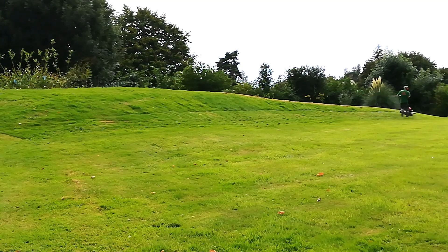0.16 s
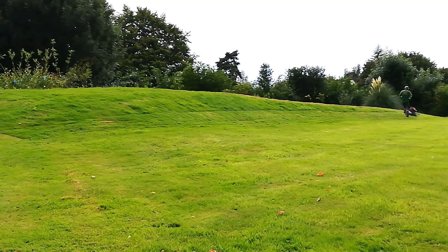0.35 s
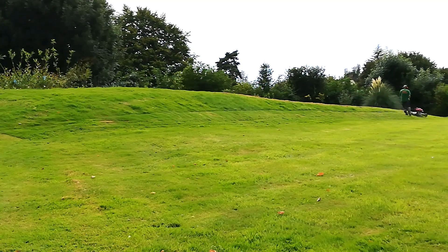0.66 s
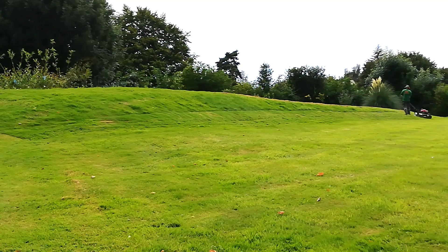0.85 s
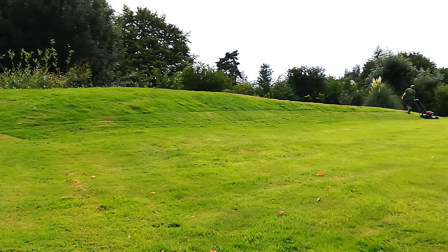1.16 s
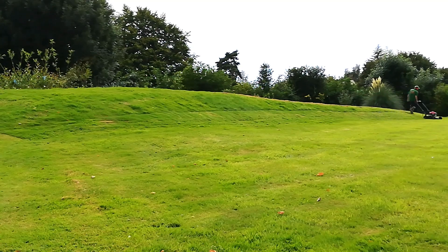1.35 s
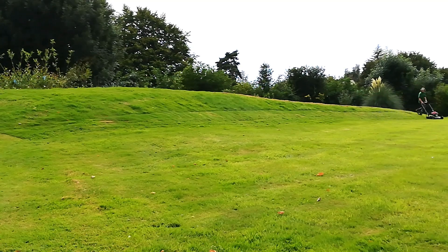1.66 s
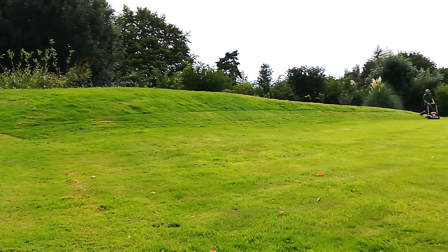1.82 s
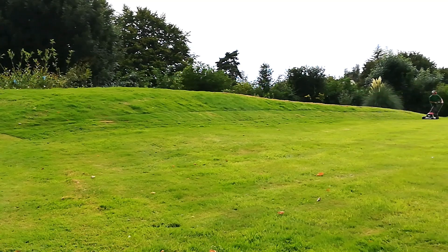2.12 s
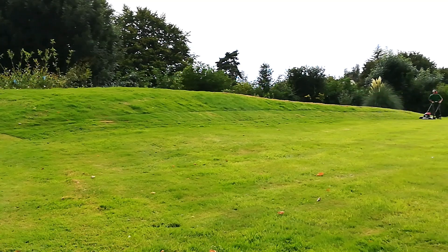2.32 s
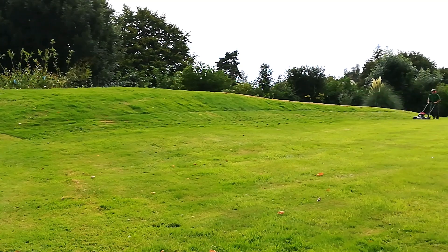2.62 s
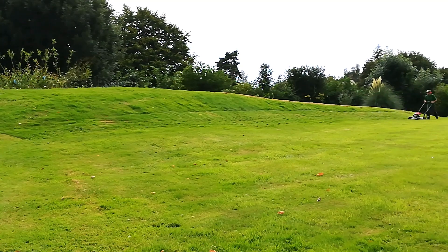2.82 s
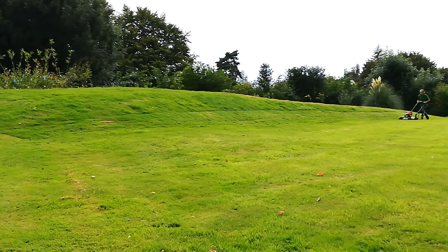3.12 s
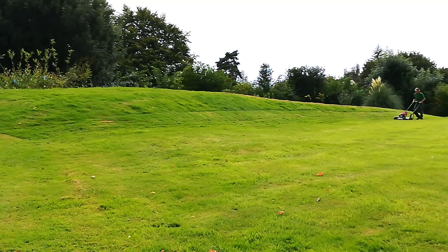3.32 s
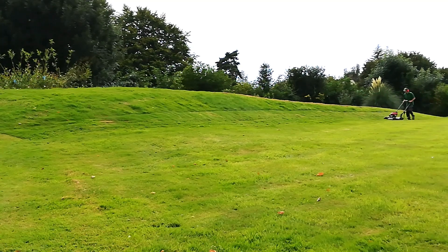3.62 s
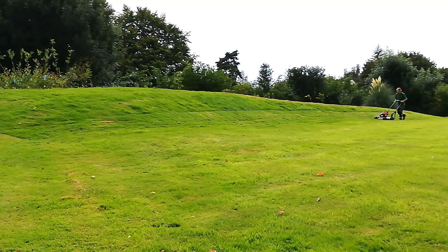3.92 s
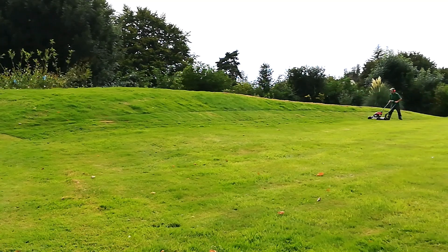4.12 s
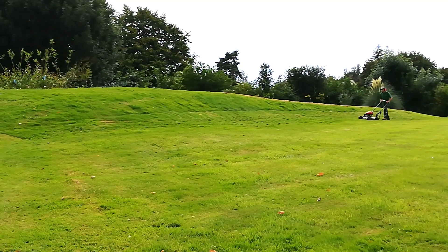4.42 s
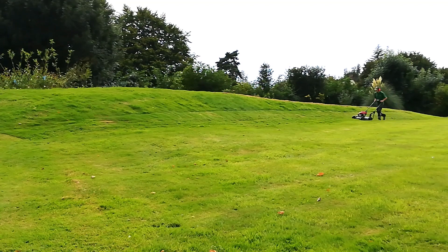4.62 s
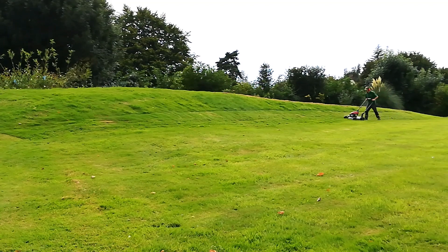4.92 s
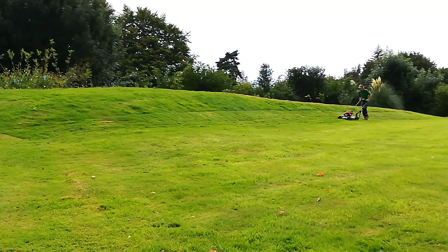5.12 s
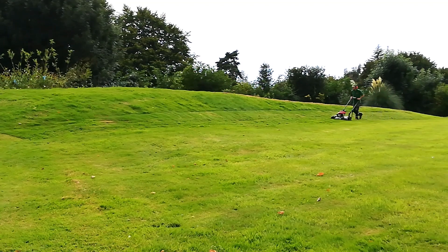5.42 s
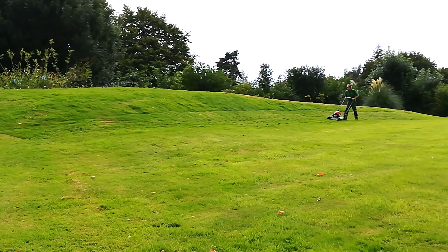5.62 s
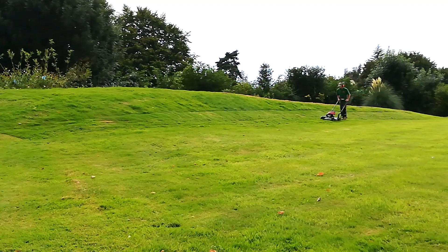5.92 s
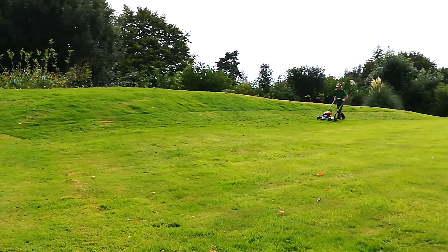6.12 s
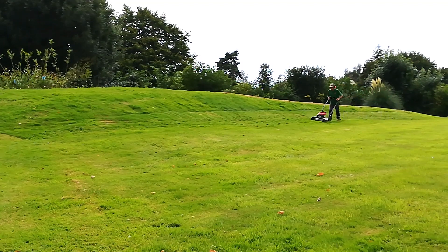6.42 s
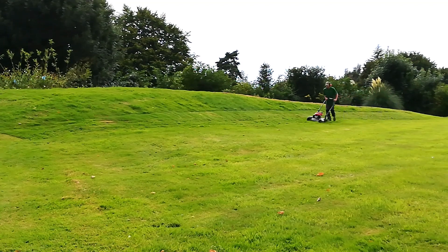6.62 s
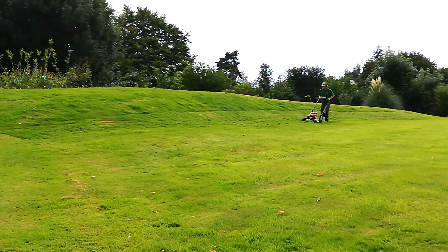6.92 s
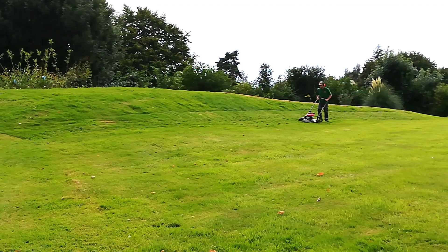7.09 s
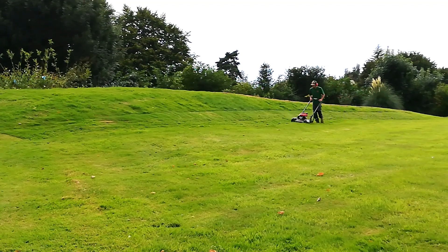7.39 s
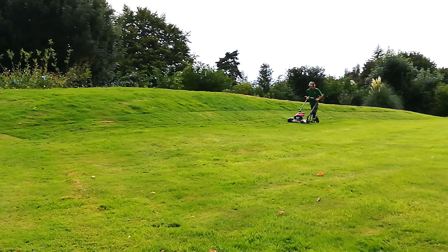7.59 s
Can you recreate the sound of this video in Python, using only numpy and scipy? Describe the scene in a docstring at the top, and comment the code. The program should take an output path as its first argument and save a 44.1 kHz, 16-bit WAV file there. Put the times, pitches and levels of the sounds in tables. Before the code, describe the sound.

A petrol walk-behind mower is heard across an open lawn, already running, about forty metres off and to the right. Its low hum, near 105 strokes a second, carries irregular dull thumps and sharp, dry exhaust cracks as the engine skips beats. From 0.5 to 2 s it turns: firing is more even, pitch lifts slightly around 1.2 s, and hollow deck notes glide up and down; the hum dips near 1.8 s. From about 2.5 s it approaches, the blade rush and grass hiss growing until about 6.3 s, with a more ringing exhaust late on, and moves toward centre. After 7 s the drone fills out, still running at the end. Wind rumbles softly early, then buffets the microphone at 4.1-5.7 s, hardest near 5 s. A small tap sounds left at 3.4 s, a sharp tick at 5.6 s. Leaves rustle faintly throughout.

```python
"""Petrol mower crossing a lawn

A petrol mower works far to the right, turns, then comes nearer and towards the middle.
Its lightly loaded engine skips beats: each firing is a thump in the silencer and a crack of gas at the outlet.
Under them, each stroke pumps a hum and the blade makes noise, chopped into a rush and a hiss of cut grass.
Wind rumbles at the two microphone ports of a camera; leaves rustle, and there is one tap and one sharp tick."""
import sys
import numpy as np
from scipy import signal
from scipy.fft import rfft, irfft, next_fast_len
from scipy.io import wavfile
from scipy.ndimage import uniform_filter1d, map_coordinates

SR = 44100
rng = np.random.default_rng(int(sys.argv[2]) if len(sys.argv) > 2 else 0)


def inscribe(sig):
    """Save sig as 16-bit PCM at rate SR to the path in sys.argv[1].

    A 1-D sig is mono; a 2-D sig holds one channel per row.
    Samples are clipped to [-1, 1] before scaling.
    """
    pcm = np.round(np.clip(np.atleast_2d(sig).T, -1, 1) * 32767)
    wavfile.write(sys.argv[1], SR, pcm.astype(np.int16))


N = 341775
TIME = np.arange(N) / SR  # seconds
SIZE = next_fast_len(N + 8192)  # transform length, with room for filters to ring out
BINS = np.arange(SIZE // 2 + 1) * SR / SIZE  # frequencies in Hz

# Engine speed, which the governor lets wander a little: [t/s, stroke rate f/Hz]
STROKE_RATE = [(0, 106), (.45, 104.7), (.7, 106.5), (.88, 110), (1.22, 111.6), (1.62, 106.6), (1.85, 105.7),
               (2.15, 106.5), (2.45, 103), (2.65, 103.7), (3.15, 107.2), (3.45, 105), (3.7, 107.2),
               (4.3, 104.8), (4.55, 106.5), (5.45, 106.8), (5.62, 103.3), (6.3, 105.3), (6.9, 106),
               (7.15, 104), (7.75, 105.8)]
# The hardest firings: [t/s, strength level/dB, relative]
HARD_FIRINGS = [(0.2007, 9.0), (0.2404, 7.5), (0.2598, 11.0), (0.2972, 10.5), (0.3456, 11.0), (0.401, 8.5),
                (0.4237, 7.0), (0.6514, 10.5), (0.6993, 7.5), (0.7744, 11.5), (0.7928, 7.0), (0.8654, 10.5),
                (0.8839, 9.0), (1.2605, 9.0), (1.3321, 11.0), (1.4234, 11.0), (1.4416, 8.5), (1.496, 7.5),
                (1.5332, 7.5), (1.5584, 8.0), (1.5845, 7.5), (1.609, 13.5), (1.6284, 7.5), (1.7215, 11.0),
                (1.7981, 8.0), (1.8407, 8.5), (2.1435, 9.0), (2.2176, 8.0), (2.256, 8.0), (2.6531, 7.5),
                (2.6925, 8.0), (2.7691, 8.0), (2.8641, 9.0), (2.92, 8.5), (3.351, 7.0), (3.4745, 7.5),
                (3.6526, 7.0), (3.9524, 8.5), (3.9714, 7.5), (4.0006, 9.0), (4.0467, 8.0), (4.1333, 7.0),
                (4.2662, 8.0), (4.3852, 8.0), (4.4236, 10.5), (4.4435, 9.0), (4.5166, 9.0), (4.5436, 7.0),
                (4.6014, 10.0), (4.6518, 13.5), (4.7551, 9.0), (4.8302, 11.0), (4.9277, 7.5), (5.256, 7.0),
                (5.351, 10.5), (5.3757, 8.5), (5.5146, 8.0), (5.768, 7.5), (5.7887, 7.5), (6.0661, 7.5),
                (6.2776, 7.5), (6.3724, 8.5), (6.5054, 7.5), (6.5817, 12.0), (6.7156, 9.5), (6.9062, 11.0),
                (7.0671, 10.0), (7.0875, 9.5), (7.1444, 12.0), (7.1651, 11.0), (7.202, 12.0),
                (7.2981, 10.5), (7.3455, 9.5), (7.3731, 8.5), (7.4325, 8.0), (7.4809, 8.5), (7.5083, 8.0),
                (7.5268, 9.0), (7.5472, 8.5), (7.6241, 9.0), (7.6712, 10.5)]
# Distance of the mower: [t/s, distance/m]
DISTANCE = [(0, 38.6), (2.2, 41.9), (3.8, 38.8), (6.3, 26.2), (7.75, 28.1)]
# Direction of the mower: [t/s, how much later the left port hears it/microseconds]
LEFT_DELAY = [(0, 131), (1.2, 147), (2.8, 142), (4.3, 110), (6.1, 72.2), (7.75, 39)]

# Tone colours: only the shape counts, as each sound is then set to rms 1. All: [f/Hz, relative level/dB]
# Thump of the silencer
SILENCER_TONE = [(25, -19.5), (42, -3.5), (62, 2.5), (85, -15), (108, 0.5), (152, 8), (180, 1.5),
                 (215, -2.5), (257, -2.5), (292, -12), (320, -7), (370, -21), (425, -27), (520, -46.5),
                 (1000, -23), (3000, -103)]
# Rush of air in the deck
RUSH_TONE = [(150, 17), (400, -2), (600, 0.5), (780, -8), (1000, -12), (1450, -0.5), (1750, -3.5),
             (2400, 0.5), (3100, 1), (3900, -1.5), (5000, -4.5), (9000, -32), (16000, -30)]
# Hiss of cut grass
HISS_TONE = [(2000, -31), (3800, 0), (5050, -1), (5700, 4), (6900, 2), (7800, 2.5), (9100, 2.5),
             (10000, -2), (11000, -9), (13000, -15), (16000, -25)]
# Gas cracking at the outlet
CRACK_TONE = [(700, -26), (1500, -10), (3000, -3), (4200, -4.5), (5050, -2.5), (5800, 0.5), (6900, 3.5),
              (7900, -1), (9500, -4), (11000, -16), (16000, -38)]
# Ringing of the outlet's shell
RING_TONE = [(800, -34), (1400, -12), (2000, -15), (3000, -9.5), (3800, -17), (4700, -16), (5100, 0),
             (5400, -3), (5900, -14), (6800, -14), (8500, -40)]
# Hollow notes of the deck
HOLLOW_TONE = [(600, -23), (780, -14.5), (890, -3), (1020, -5), (1180, -1), (1400, -3.5), (1750, -9.5),
               (2200, -6.5), (2600, -10), (3000, -5), (4000, -28)]
# Deep rumble of the wind
WIND_TONE = [(15, -18), (33, -1.5), (70, 2), (130, -7), (220, -16), (400, -42.5), (1000, -88)]
# Finer churning of strong wind
CHURN_TONE = [(30, -32), (90, -6), (170, -7), (260, -14), (400, -33), (1000, -60.5)]
# Sharp tick from the blade
TWIG_TONE = [(1000, -19), (2200, -4), (2700, 5), (3300, 1), (4100, -1), (4800, -20), (6800, 4),
             (12000, -45)]
# Rustle of leaves
LEAVES_TONE = [(100, -5), (400, -14.5), (800, -11), (2000, -53), (6000, -44), (11000, -29), (16000, -33)]

# The camera body shades its two ports differently: [f/Hz, left minus right level/dB]
PORT_SHADE = [(200, 0.35), (350, -0.5), (550, -8), (800, -15), (1100, -4.5), (1850, 3.5), (2600, -9.5),
              (3100, -9), (3800, -0.5), (5200, -3.5), (6500, -5), (8200, 0.5), (10200, 8), (12000, 0.5)]
# The phase between the two ports also turns: [f/Hz, lead of the right port/radians]
PORT_PHASE = [(100, 0.07), (330, 0.79), (600, 2), (720, 1.5), (880, 0.38), (1600, -0.09), (2450, 0.58),
              (3200, 0), (4000, 0.5), (7000, 0.46), (9000, 0.39), (11500, 2.13)]
# Gusts over the ports: [t/s of the middle, width at half power/s, rumble level/dB before churning and patches]
GUSTS = [(.06, .16, -37), (.39, .1, -41), (.68, .14, -44), (1.05, .06, -44), (1.6, .2, -47),
         (4.18, .18, -37), (4.44, .13, -32), (4.64, .12, -41), (4.87, .22, -40), (5.07, .14, -37.5),
         (5.32, .2, -39.5), (5.55, .12, -44), (5.7, .08, -42), (7.1, .6, -50), (7.41, .09, -39)]
# Single eddies that hit the ports: [t/s of the middle, peak level/dB, f/Hz]
EDDIES = [(0.39, -30, 44.4), (4.36, -24.5, 45), (4.396, -21.5, 109), (4.419, -21, 139), (4.45, -21, 75),
          (4.476, -23, 121), (4.521, -29, 109), (4.629, -31, 45), (4.772, -24.5, 48), (5.005, -13.5, 95),
          (5.068, -20, 48), (5.128, -23, 60), (5.25, -23.5, 77), (5.69, -24.5, 80)]
# Patches of grass that raise or lower the whole treble: [t/s of the middle, width/s, level change/dB]
GRASS_PATCHES = [(0.103, 0.63, -0.5), (2.752, 0.36, 2), (3.99, 0.37, 3)]
# The hum fades on the mower's quiet side: [start t/s, attack/s, hold/s, release/s, level change/dB]
HUM_DIPS = [(-.1, 0.25, 0.45, 0.17, -7), (0.852, 0.3, .6, 0.31, -6)]

# Levels at FAR_M, and their rise for each halving of the distance:
# the lawn swallows the middle and the treble most
FAR_M = 40
THUMP_DB, THUMP_NEARING_DB = -42, 6.5  # before its tone is adjusted
HUM_DB, HUM_NEARING_DB = -38.5, 5  # once per stroke
OVERTONES_DB, OVERTONES_NEARING_DB = -56.5, 7  # third harmonic of the hum; the fourth follows it
RUSH_DB, RUSH_NEARING_DB = -46.5, 12.5
TREBLE_DB, TREBLE_NEARING_DB = -49.5, 12  # reference for both hiss and cracks

# The turn, which shows the outlet: (start s, attack s, hold s, release s)
TURN = (0.44, 0.26, 1, 0.56)
TURN_THUMP_DB, TURN_TREBLE_DB, TURN_OVERTONES_DB = 2, -2, -6
TURN_BASS_DB, TURN_BODY_DB, BODY_NEARING_DB = -6, 0.5, 2  # tone of the silencer
# A stretch of more even firing, laid out like TURN, and the average strokes per firing outside and in it
EVEN_RUN = (.55, .12, 1.1, .1)
SKIP_STROKES, EVEN_STROKES = 2.58, 2
# At first the mower is pushed away and its silencer is muffled
AWAY_UNTIL_S, AWAY_FADE_S = 0.7, 0.32
AWAY_BODY_DB, AWAY_OVERTONES_DB = -7.5, -6
# Late in the turn the engine block hides the silencer
SHADOW_S, SHADOW_LENGTH_S, SHADOW_THUMP_DB, SHADOW_HUM_DB = 1.84, 0.44, -1.5, -13.5
# At the end the mower comes side-on and the drone fills out
SIDE_ON_S, SIDE_ON_RISE_S = 7.03, 1
SIDE_ON_BODY_DB, SIDE_ON_OVERTONES_DB = 3.5, 3

# As the mower swings round, the open deck and the hum's octave stand out (laid out like TURN)
HOLLOW_SWELL = (0.11, 0.6, 0.25, 1.2)
HOLLOW_DB, HOLLOW_RISE_DB = -15.5, 9  # over the rush
HOLLOW_GLIDE, HOLLOW_GLIDE_S, HOLLOW_GLIDE_LENGTH_S = .28, 1.38, .8  # its notes rise by this share and fall
OCTAVE_SWELL = (0.78, 0.14, 0.94, 0.14)
OCTAVE_DB, OCTAVE_RISE_DB = -58.5, 8.5

# The outlet rings most when it points at the camera: in the turn and late in the approach
RING_AWAY_DB, RING_FACING_DB = -17, 0.5  # over the crack
FACES_S, FACES_RISE_S = 5.36, 0.75
TURN_FACING = 0.72  # how squarely it points at the camera in the turn, 0-1
RING_WANDER_HZ = 450  # spread, about, of the ringing note's wandering in the turn

BREEZE_DB = -57  # rumble between the gusts
CHURN_DB = -22  # gust level at which the churning equals the rumble
TAP_S, TAP_DB, TAP_DECAY_S = 3.423, -18, 0.0042  # a small tap; level before its push is softened
TWIG_S, TWIG_DB, TWIG_DECAY_S = 5.566, -35.5, 0.011  # the blade clips something hard
TOP_HZ = 15900  # upper limit of the treble


def undb(db):
    """Turn decibels into a gain."""
    return 10 ** (np.asarray(db) / 20)


def unit(x):
    """Scale a sound to rms 1."""
    return x / np.sqrt(np.mean(x ** 2))


def track(table):
    """Join timed values by straight lines, giving one value per sample."""
    s, value = np.transpose(table)
    return np.interp(TIME, s, value)


def over_bins(points):
    """Join (Hz, value) points on a log-frequency axis."""
    hz, value = np.transpose(points)
    return np.interp(np.log(BINS + 1), np.log(hz), value)


def filtered(x, response):
    """Apply a frequency response to a sound."""
    return irfft(rfft(x, SIZE) * response, SIZE)[..., :N]


def colour(x, points, causal=1):
    """Give a sound a tone colour and rms 1; with causal under 1 the filter swells before it rings."""
    cepstrum = irfft(np.log(undb(over_bins(points))), SIZE)
    # moving weight to the first half makes the filter ring only after each sound
    cepstrum[1:SIZE // 2] *= 1 + causal
    cepstrum[SIZE // 2 + 1:] *= 1 - causal
    return unit(filtered(x, np.exp(rfft(cepstrum))))


def noise():
    """White noise: an equal share of all frequencies."""
    return rng.standard_normal(N)


def walk(rate):
    """A smooth random wander around 0, with a new target rate times a second and a spread near 1."""
    k = int(SR / rate)
    steps = np.repeat(rng.standard_normal(N // k + 1), k)
    return 1.53 * uniform_filter1d(uniform_filter1d(steps, k), k)[:N]


def fade(start_s, decay_s):
    """A sudden start and an exponential decay."""
    return (TIME >= start_s) * np.exp(-np.abs(TIME - start_s) / decay_s)


def envelope(start_s, attack_s, hold_s, release_s):
    """Rise from 0 to 1, hold, and fall back."""
    corners_s = np.cumsum([0, attack_s, hold_s, release_s])
    return np.interp(TIME - start_s, corners_s, [0, 1, 1, 0])


def swell(s, length_s):
    """A smooth bump of height 1, length_s wide at half height."""
    return .5 ** ((2 * (TIME - s) / length_s) ** 2)


def pulses(at, size):
    """Single-sample clicks at the given samples."""
    return np.bincount(at, size, N)[:N]


def shifted(x, hz):
    """Move every frequency of a sound by hz, moment by moment."""
    spin = np.exp(2j * np.pi * np.cumsum(hz) / SR)
    return np.real(signal.hilbert(x, SIZE)[:N] * spin)


def toned(x, bass_db, body_db, below_hz=95, body_hz=280):
    """Raise or lower the bass and the body of a sound, moment by moment."""
    bass = filtered(x, 1 / (1 + (BINS / below_hz) ** 6))
    body = filtered(x, np.exp(-(np.log((BINS + 1) / body_hz) / .35) ** 2))
    return x + (undb(bass_db) - 1) * bass + (undb(body_db) - 1) * body


def leaves(db=-63, sway_db=1):
    """Many tiny leaf sounds blend into a faint noise, separate at each port, that sways slowly."""
    rustle = np.array([colour(noise(), LEAVES_TONE) for _ in range(2)])
    return rustle * undb(db + sway_db * walk(1.0))


def wind(patchy_db=3.7, unlike=0.87, unlike_hz=170):
    """Wind rumbles in patches, most alike at both ports in the deep; strong gusts churn and eddies push."""
    gust_power = sum(undb(db) ** 2 * swell(s, length_s) for s, length_s, db in GUSTS)
    gust = np.sqrt(undb(BREEZE_DB) ** 2 + gust_power)
    churning = gust / undb(CHURN_DB)
    common = colour(noise(), WIND_TONE) + churning * colour(noise(), CHURN_TONE)
    side = colour(noise(), WIND_TONE) + churning * colour(noise(), CHURN_TONE)
    side = unlike * filtered(side, BINS / np.hypot(BINS, unlike_hz))
    rumble = (common + side * np.array([[1], [-1]])) * gust * undb(patchy_db * walk(16))
    for s, db, hz in EDDIES:
        # each eddy sucks, then pushes
        angle = np.clip(2 * np.pi * hz * (TIME - s), -10, 10)
        rumble = rumble + undb(db) * angle * np.exp((1 - angle ** 2) / 2)
    return rumble


def ticks(tap_right=0.08, soft_hz=300, click_hz=1350, click=0.49, click_s=0.00052):
    """A tap, mostly at the left port, is a click on a soft push of air; the blade's tick is a noise burst."""
    push = filtered(fade(TAP_S, TAP_DECAY_S), 1 / (1 + 1j * BINS / soft_hz))
    thin_click = click * fade(TAP_S, click_s) * np.sin(2 * np.pi * click_hz * (TIME - TAP_S))
    tap = (push + thin_click) * np.array([[1], [tap_right]])
    twig = np.array([colour(noise(), TWIG_TONE) for _ in range(2)]) * fade(TWIG_S, TWIG_DECAY_S)
    return undb(TAP_DB) * tap + undb(TWIG_DB) * twig


def scatter(x, db=-10, low_hz=450):
    """Moving grass and air pass on a later copy, its phase scrambled differently at each port."""
    thin = signal.hilbert(filtered(x, BINS ** 2 / (BINS ** 2 + low_hz ** 2)), SIZE)
    echoes = []
    for late_s in (.0031, .0047):  # left, right
        late = np.roll(thin, int(late_s * SR))[:N]
        echoes.append(late * np.exp(1j * np.pi * walk(40)))
    return undb(db) * np.real(echoes)


def ports(x):
    """Sound reaches the right port first; the camera body colours the two sides differently."""
    delay_s = track(LEFT_DELAY) / 10 ** 6
    late = map_coordinates(x, [(TIME - delay_s) * SR], order=5)
    left = filtered(late, np.exp(-1j * over_bins(PORT_PHASE)))
    direct = np.array([left, x])
    shade = undb(np.array([[1], [-1]]) * over_bins(PORT_SHADE) / 2)
    shade = shade / np.sqrt(np.mean(shade ** 2, axis=0))  # keep the mean power of the two sides
    return filtered(direct + scatter(x), shade)


def blade(at, shape, chop=.3, chop_s=0.0036, flutter_db=1.5):
    """Air and grass whirl in the deck as noise, chopped at every pass of the blade."""
    passes = unit(filtered(pulses(at, None), rfft(fade(0, chop_s), SIZE)))
    return colour(noise() * (1 + chop * passes), shape) * undb(flutter_db * walk(14))


def deck(at, near):
    """The blade's rush, with hollow notes that swell and glide while the deck shows its open back."""
    # reading the noise faster raises its notes
    glide = 1 + HOLLOW_GLIDE * swell(HOLLOW_GLIDE_S, HOLLOW_GLIDE_LENGTH_S)
    hollow = blade(at, HOLLOW_TONE, chop=0.064, flutter_db=1.3)
    hollow = map_coordinates(hollow, [np.cumsum(glide)], mode="mirror")
    hollow_db = HOLLOW_DB + HOLLOW_RISE_DB * envelope(*HOLLOW_SWELL)
    rush = blade(at, RUSH_TONE, chop=0.071, flutter_db=0.73)
    return undb(RUSH_DB + RUSH_NEARING_DB * near) * (rush + undb(hollow_db) * hollow)


def crank(wobble=0.0026, inertia_s=.12):
    """Strokes done so far: the speed wobbles, and the flywheel eases into step with the hard firings."""
    turns = np.cumsum(track(STROKE_RATE) * (1 + wobble * walk(14))) / SR
    hard_s, span = np.transpose(HARD_FIRINGS)[0], int(inertia_s * SR)
    # how far the count is ahead of the hard firings, smoothed on a circle and then unrolled
    phasor = np.interp(TIME, hard_s, np.exp(2j * np.pi * np.interp(hard_s, TIME, turns)))
    phase = np.unwrap(np.angle(uniform_filter1d(phasor, span)))
    ahead = np.interp(hard_s, TIME, phase) / (2 * np.pi)
    return turns - uniform_filter1d(np.interp(TIME, hard_s, ahead), span)


def firings(turns, even, usual_db=9.5, per_skip_db=2.5, uneven_db=5.5, even_scatter_db=3.0, most_db=6.0):
    """Sample and strength of each stroke: fresh charge builds until it lights, stronger after a longer wait."""
    at = np.flatnonzero(np.diff(np.floor(turns)) > 0)
    # the stroke nearest to each hard firing
    hard = {int(np.argmin(np.abs(at - s * SR))): (s, db) for s, db in HARD_FIRINGS}
    wait = SKIP_STROKES + (EVEN_STROKES - SKIP_STROKES) * even[at]
    intake_chance, strength_chance = rng.standard_normal((len(at), 2)).T
    intake = (1 + .15 * (wait - 2) * intake_chance) / wait
    scatter_db = (uneven_db + (even_scatter_db - uneven_db) * even[at]) * strength_chance
    strength, charge, last = np.zeros(len(at)), 0, 0
    for k in range(len(at)):
        charge += intake[k]
        if k in hard:
            s, db = hard[k]
            at[k], strength[k] = int(s * SR), undb(db)
            charge, last = 1 / 10, k  # a hard firing leaves little charge
        elif charge >= 1 and k - last >= 2 and k + 1 not in hard:
            level_db = usual_db + per_skip_db * (k - last - 4.5) + scatter_db[k]
            strength[k] = undb(min(most_db, level_db))
            charge, last = charge - 1, k
    return at, strength


def outlet(at, strength, ring_db, wander_hz, rise_s=0.00089, decay_s=0.0027, miss=0.065, tail=0.11, tail_s=0.01):
    """Gas bursts out as short noise and rings the shell; every stroke leaks a little, firings far more."""
    burst = (1 - fade(0, rise_s)) * (fade(0, decay_s) + tail * fade(0, tail_s))
    gas = noise() * filtered(pulses(at, miss + strength), rfft(burst, SIZE))
    ring = shifted(colour(gas, RING_TONE), wander_hz)
    return colour(gas, CRACK_TONE) + undb(ring_db) * ring


def treble(at, strength, near, turning, air_db=-1.23, crack_db=0.17, crack_nearing_db=-1.5):
    """The bright voice: cracks of gas at the outlet over the hiss of cut grass."""
    facing = TURN_FACING * turning + np.clip((TIME - FACES_S) / FACES_RISE_S, 0, 1)
    ring_db = RING_AWAY_DB + (RING_FACING_DB - RING_AWAY_DB) * facing
    cracks = outlet(at, strength, ring_db, RING_WANDER_HZ * turning * walk(30))
    hiss = blade(at, HISS_TONE, chop=0.41, flutter_db=1.0)
    patch_db = sum(db * swell(s, length_s) for s, length_s, db in GRASS_PATCHES)
    level_db = TREBLE_DB + TREBLE_NEARING_DB * near + TURN_TREBLE_DB * turning + patch_db
    return undb(level_db) * (undb(crack_db + crack_nearing_db * near) * cracks + undb(air_db) * hiss)


def silencer(at, strength, hardness=0.54, lead_s=0.00026):
    """A firing pushes more gas through the silencer than the average stroke, a missed stroke less."""
    push = strength ** hardness
    surplus = push - uniform_filter1d(push, size=16)
    puffs = pulses(np.maximum(at - int(lead_s * SR), 0), surplus)
    return colour(puffs, SILENCER_TONE, causal=.72)


def hum(turns, first_db, second_db, third_db, lag=0.084, third_lag=0.23, fourth_db=-11, waver_db=0.96,
        flicker_db=1.76):
    """The piston pumps air on every stroke, fired or not: a hum with wavering harmonics."""
    angle = 2 * np.pi * (turns + lag)  # lags are shares of a cycle
    low = undb(first_db) * np.cos(angle) - undb(second_db) * np.sin(2 * angle)
    third = np.cos(3 * angle + 2 * np.pi * third_lag + .2 * walk(25))
    fourth = undb(fourth_db) * np.cos(4 * angle + .6 * walk(20))  # relative to the third
    low = low * undb(waver_db * walk(6.4))
    overtones = undb(third_db + flicker_db * walk(8)) * (third + fourth)
    return np.sqrt(2) * (low + overtones)


def engine(at, strength, turns, near, away, turning):
    """The low voice: thumps of the silencer over the hum of the strokes."""
    shadow = swell(SHADOW_S, SHADOW_LENGTH_S)
    side_on = np.clip((TIME - SIDE_ON_S) / SIDE_ON_RISE_S, 0, 1)
    thump_db = THUMP_DB + THUMP_NEARING_DB * near + TURN_THUMP_DB * turning + SHADOW_THUMP_DB * shadow
    body_db = BODY_NEARING_DB * near + TURN_BODY_DB * turning
    body_db = body_db + AWAY_BODY_DB * away + SIDE_ON_BODY_DB * side_on
    thumps = toned(silencer(at, strength), TURN_BASS_DB * turning, body_db)
    dips_db = sum(db * envelope(*shape) for *shape, db in HUM_DIPS)
    hum_db = HUM_DB + HUM_NEARING_DB * near + SHADOW_HUM_DB * shadow + dips_db
    octave_db = OCTAVE_DB + OCTAVE_RISE_DB * envelope(*OCTAVE_SWELL)
    overtones_db = OVERTONES_DB + OVERTONES_NEARING_DB * near + TURN_OVERTONES_DB * turning
    overtones_db = overtones_db + AWAY_OVERTONES_DB * away + SIDE_ON_OVERTONES_DB * side_on
    return undb(thump_db) * thumps + hum(turns, hum_db, octave_db, overtones_db)


def mower():
    """Engine, deck and outlet share one crank; distance and heading set their levels."""
    near = np.log2(FAR_M / track(DISTANCE))  # halvings of the distance
    away = 1 - np.clip((TIME - AWAY_UNTIL_S) / AWAY_FADE_S, 0, 1)
    turning = envelope(*TURN)
    turns = crank()
    at, strength = firings(turns, envelope(*EVEN_RUN))
    low_voice = engine(at, strength, turns, near, away, turning)
    return low_voice + deck(at, near) + treble(at, strength, near, turning)


def scene():
    """The mower across the lawn, with leaves, wind and ticks at the ports."""
    return ports(mower()) + leaves() + wind() + ticks()


def record(dry):
    """The camera cuts the top of the treble with a steep low-pass filter."""
    low_pass = signal.ellip(10, .2, 80, TOP_HZ, fs=SR, output="sos")
    return signal.sosfilt(low_pass, dry)


dry = scene()
out = record(dry)
inscribe(out)
```